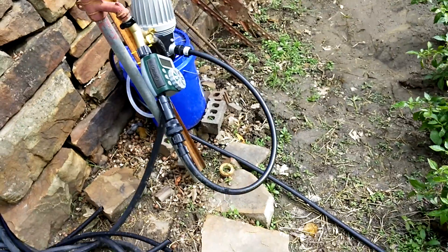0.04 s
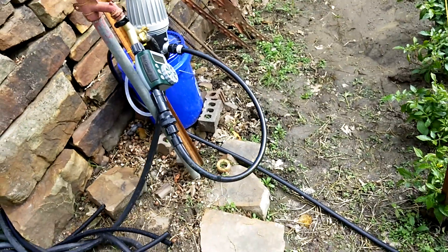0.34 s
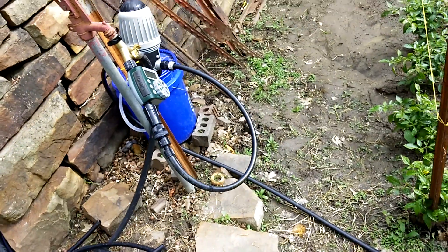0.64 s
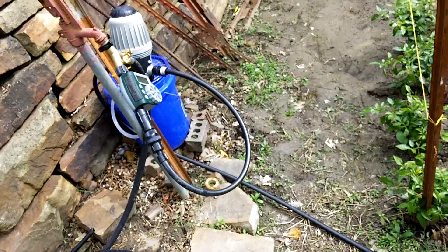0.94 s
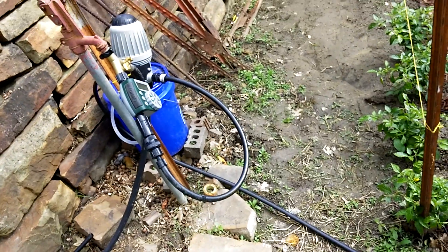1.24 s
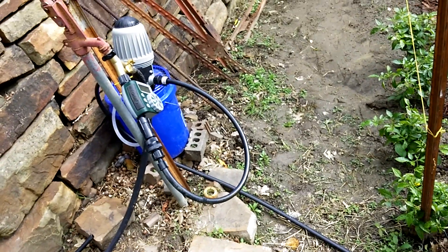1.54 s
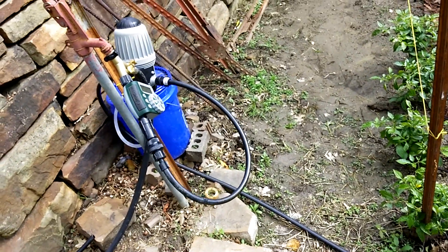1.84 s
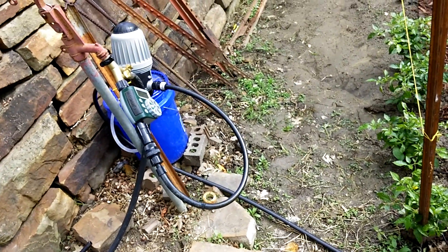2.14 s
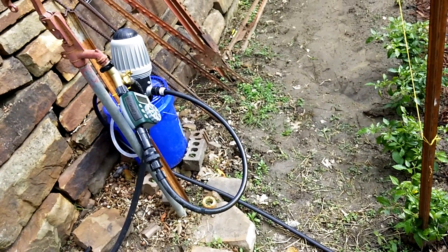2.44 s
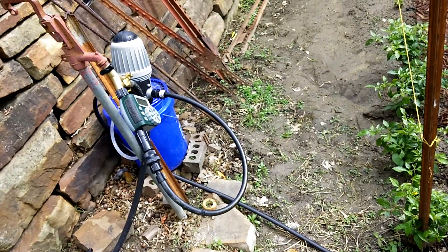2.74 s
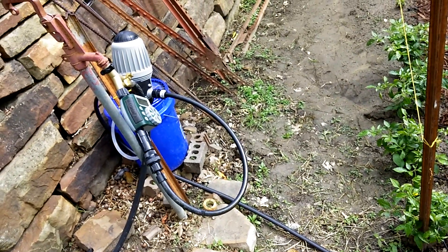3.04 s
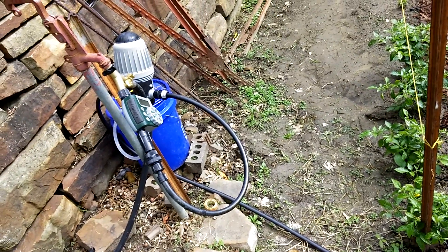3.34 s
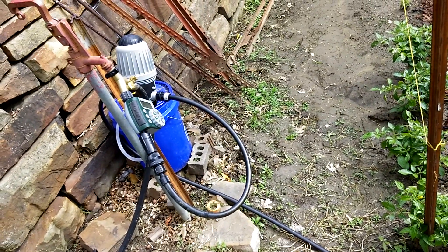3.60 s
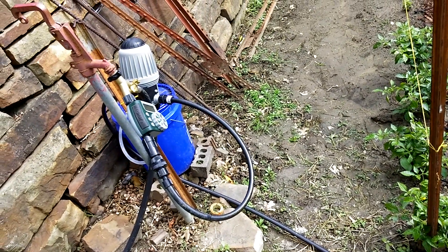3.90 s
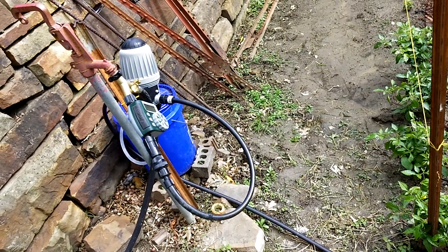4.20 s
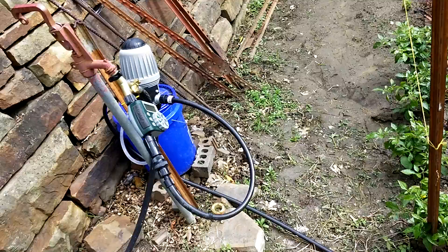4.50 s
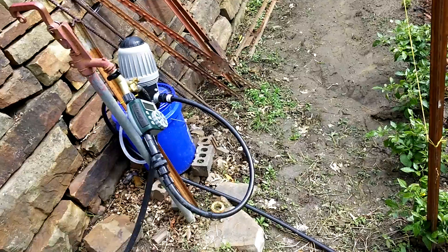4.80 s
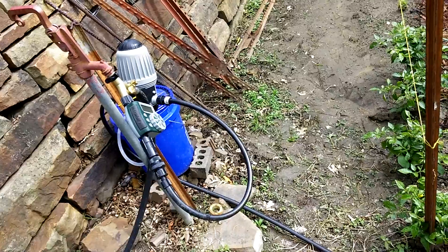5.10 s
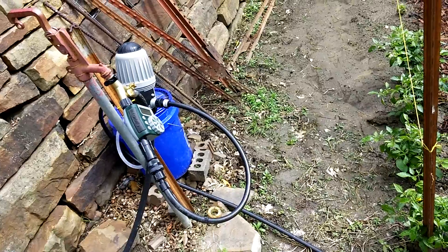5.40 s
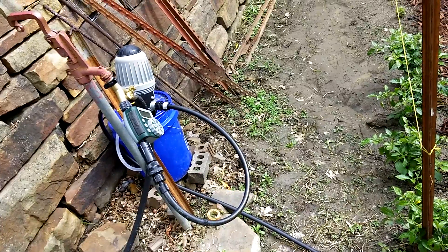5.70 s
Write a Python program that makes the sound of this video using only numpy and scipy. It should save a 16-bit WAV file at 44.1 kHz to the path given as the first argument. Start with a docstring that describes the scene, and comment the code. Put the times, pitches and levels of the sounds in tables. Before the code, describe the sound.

It begins quietly outdoors, with a low distant wash and a little wind rumbling on the microphone. Around 0.5 seconds a hand rubs a valve handle, which gives several small dry clicks. At about 1.3 seconds the handle squeaks faintly and clicks again. At 1.7 seconds the valve opens with a sharp knock and a gush, and water hisses into a garden hose, high and fizzy, close and toward the right. The hiss is strongest until about 2.2 seconds, then settles. The plastic housing of a fertilizer injector rushes, hums low and gurgles as it fills. From 2.5 seconds its piston makes tight, hollow double knocks, a little over twice a second. The splashing inside builds until nearly 4 seconds, then drops to a trickle. The hiss, rush, occasional glugs and steady knocks continue to the end, just short of 6 seconds.

```python
"""Outdoors, over a distant wash and a little wind, a hand rubs, clicks and squeaks a valve handle.
At about 1.7 seconds the valve of the garden drip line opens: water slams in and hisses through it.
The plastic housing of a fertilizer injector rushes, gurgles and hums as it fills, and its piston
settles into a double knock a little over twice a second. Near 4 seconds the air is out of the housing
and the splashing drops to a trickle, while the hiss, rush and knocks carry on."""
import sys
import numpy as np
from scipy import signal
from scipy.fft import rfft, irfft
from scipy.io import wavfile
from scipy.ndimage import uniform_filter1d

SR = 44100
rng = np.random.default_rng(int(sys.argv[2]) if len(sys.argv) > 2 else 0)


def put_to_file(sound):
    """Save the sound as 16-bit audio at rate SR, in the file named by the first command-line argument."""
    columns = np.atleast_2d(sound).T  # one column per channel
    safe = np.clip(columns, -1, 1)
    whole_steps = np.round(safe * 32767)
    wavfile.write(sys.argv[1], SR, whole_steps.astype(np.int16))


N = 253575
T = np.arange(N) / SR  # the time of every sample
HZ = np.fft.rfftfreq(N, 1 / SR)  # the frequency of every point in a spectrum
OPEN_S = 1.736  # the valve lets go
SINCE_OPEN_S = np.maximum(T - OPEN_S, 0)
OPENED = np.clip(SINCE_OPEN_S / 0.00047, 0, 1)  # 0 while the valve is shut, then 1


def amp(db):
    """Turns decibels into a number to multiply a sound by."""
    return 10 ** (np.asarray(db) / 20)


def unit(x):
    """Scales a signal to an average (rms) size of 1."""
    return x / np.sqrt(np.mean(x ** 2) + 1e-20)


def over_time(rows):
    """Joins (time, value) rows into a value for every sample."""
    return np.interp(T, *np.transpose(rows))


def over_frequency(rows):
    """Joins (frequency, value) rows into a value for every frequency."""
    hz, value = np.transpose(rows)
    return np.interp(np.log(HZ + 1), np.log(hz + 1), value)


def add(mix, start_s, sound):
    """Adds a sound to the mix at the given time."""
    part = mix[..., round(start_s * SR):][..., :sound.shape[-1]]
    part += sound[..., :part.shape[-1]]


def wander(hz):
    """A random drift of average size 1, wobbling up to about hz times a second."""
    return unit(irfft(rfft(rng.standard_normal(N)) / np.sqrt(1 + (HZ / hz) ** 4), N))


def noise_pair(likeness):
    """Left and right spectra of white noise: likeness 0 is unrelated, 1 is identical."""
    shared, separate = rfft(rng.standard_normal((2, N)))
    return np.array([likeness * shared + np.sqrt(1 - likeness ** 2) * separate, shared])


def sound_of(spectra):
    """Turns two spectra into stereo sound whose middle has an average size of 1."""
    stereo = irfft(spectra, N)
    return stereo / np.std(stereo.mean(0))


def pan(db):
    """Left and right gains: positive dB leans left, negative leans right."""
    return amp(np.array([[.5], [-.5]]) * db)


def resonances(modes):
    """How strongly a hollow body passes each frequency, given the notes it rings at."""
    return np.sqrt(sum(amp(db) ** 2 / (1 + 2 * ((HZ - hz) / width) ** 2) ** 2 for hz, width, db in modes))


# The tone of the distant wash. Each row: frequency in Hz, level in dB.
WASH_TONE = [(71, -11.5), (120, -5.5), (144, -14), (284, -2), (362, -6), (524, -5), (892, 2.5), (1340, -8),
             (1460, -15.5), (1860, -18), (2590, -27.5), (3590, -38.5), (5630, -42.5), (7050, -44.5),
             (16000, -51)]
# How alike it is in both ears. Each row: frequency in Hz, likeness from 0 to 1.
WASH_LIKENESS = [(100, 0.97), (400, 0.78), (1000, 0.25), (2500, 0.043), (6000, 0.08)]
# Its level in the mix, turned down once the water runs. Each row: time in seconds, level in dB.
WASH_MIX_LEVEL = [(0, -38), (.7, -34.5), (1.7, -35), (1.95, -41.5), (2.4, -38.5), (2.9, -44), (4.2, -49.5),
                  (5.75, -46.5)]


def distant_wash(waver_db=0.97):
    """A low outdoor wash that wavers slightly and is turned down in the mix once the water runs."""
    spectra = noise_pair(over_frequency(WASH_LIKENESS)) * amp(over_frequency(WASH_TONE))
    return sound_of(spectra) * amp(over_time(WASH_MIX_LEVEL) + waver_db * wander(5.5))


# The tone of the wind. Each row: frequency in Hz, level in dB.
WIND_TONE = [(15, -40), (30, -13), (43, 3.5), (100, 5.5), (140, -10), (250, -27), (700, -80)]
# The strength of the breeze. Each row: time in seconds, level in dB.
WIND_LEVEL = [(0, -58), (0.95, -48.5), (1.45, -49), (1.72, -41), (2.05, -52), (2.9, -48), (4.3, -46.5),
              (5.2, -49), (5.75, -42)]


def wind(gust_db=2.5, thump_s=5.643):
    """Gusts rumble on the microphone, with one soft thump on the left."""
    rumble = sound_of(noise_pair(1.0) * amp(over_frequency(WIND_TONE)) * pan(2.5))
    gusts = amp(over_time(WIND_LEVEL) + gust_db * wander(7))
    t = T - thump_s
    thump = amp(-27) * np.exp(-(t / .014) ** 2) * np.cos(2 * np.pi * 66 * t)
    return rumble * gusts + thump * pan(16)


# The tone of the hand rubbing the handle. Each row: frequency in Hz, level in dB.
RUB_TONE = [(1200, -1.5), (2500, 1.5), (4300, -8), (5300, -1.5), (6200, -10), (7500, -17.5), (12000, -14.5),
            (15000, -14)]
# Slides of the hand. Each row: middle in seconds, half the length in seconds, level in dB.
HAND_SLIDES = [(0.02, 0.092, -67), (0.468, 0.036, -49.5), (0.54, 0.23, -57), (1.45, 0.14, -72)]
# Clicks of the handle. Each row: start in seconds, relative level in dB, pitch in Hz.
HANDLE_CLICKS = [(.583, -26.5, 4020), (0.636, -36, 5700), (.652, -29, 4000), (.658, -30.5, 2800),
                 (0.664, -34, 3020), (0.715, -34, 3220), (.742, -39, 2800), (1.319, -52, 11000),
                 (1.327, -41, 5460), (1.331, -38, 3000), (1.479, -39, 4800), (1.718, -35, 3460)]


def handle(grip_db=-68, slide_edge_s=0.07, ring_s=0.0047, snap_s=0.00038):
    """The hand swishes over the handle, which clicks with a dry snap as it turns."""
    slides = sum(amp(db) * np.clip(.5 + (half_s - abs(T - middle_s)) / slide_edge_s, 0, 1)
                 for middle_s, half_s, db in HAND_SLIDES)
    out = sound_of(noise_pair(0.078) * amp(over_frequency(RUB_TONE))) * (amp(grip_db) + slides)
    t = T[:SR // 20]
    for start_s, db, hz in HANDLE_CLICKS:
        band = signal.butter(1, [hz * 0.94, hz * 0.99], "band", fs=SR)
        noise = rng.standard_normal((2, len(t)))
        ring = amp(db - 5) * np.exp(-t / ring_s) * unit(signal.lfilter(*band, noise))
        snap = amp(db - 13) * np.exp(-t / snap_s) * noise
        add(out, start_s, ring + snap)
    return out


def squeak(start_s=1.28, length_s=0.3, settled_hz=2550, sag_s=0.076, flutter_db=3.0):
    """The turning handle squeaks once, swelling and fading while its pitch sags and steadies."""
    strain = np.exp(-np.maximum(T - start_s, 0) / sag_s)
    roughness = (.04 + 0.146 * strain) * wander(340)
    pitch_hz = settled_hz * (1 + 0.15 * strain) * (1 + roughness)
    arch_db = -53.5 - 8.5 * (2 * (T - start_s) / length_s - 1) ** 2
    tone = np.sin(2 * np.pi * np.cumsum(pitch_hz) / SR)
    return tone * amp(arch_db + flutter_db * wander(90)) * pan(-10)


def gush(db, fade_s=0.067):
    """The strength of the first gush into the empty housing, dying away after the valve opens."""
    return amp(db) * np.exp(-SINCE_OPEN_S / fade_s)


# The low notes of the filling line. Each row: pitch in Hz, width in Hz, level in dB.
LINE_NOTES = [(190, 104, -9), (255.7, 41, 3), (331, 35, -4)]


def hollow_note(climb_db_per_s=5):
    """The line hums with the first gush, then swells steadily as it fills."""
    level = np.hypot(gush(-42), amp(-56.5 + climb_db_per_s * SINCE_OPEN_S))
    return sound_of(noise_pair(0.98) * resonances(LINE_NOTES)) * level * OPENED


# The notes of the loose water. Each row: pitch in Hz, width in Hz, level in dB.
SPLASH_NOTES = [(640, 80, -11.5), (920, 170, -0.5), (1029, 61, 3.5)]


def splash(build_db_per_s=9.5, air_out_s=3.85, fade_s=0.065, trickle_db=-50.5, churn_db=2.5):
    """Water gushes in, tumbles harder until the air is out of the housing, then dies to a trickle."""
    build_up = amp(-59 + build_db_per_s * SINCE_OPEN_S)
    tumble = build_up * np.exp(-np.maximum(T - air_out_s, 0) / fade_s)
    level = np.sqrt(gush(-35) ** 2 + tumble ** 2 + amp(trickle_db) ** 2)
    water = sound_of(noise_pair(0.8) * resonances(SPLASH_NOTES) * pan(-2))
    return water * level * amp(churn_db * wander(54)) * OPENED


# Air pockets in the water. Each row: start in seconds, relative level in dB, pitch in Hz.
AIR_POCKETS = [(1.791, -20.5, 1290), (1.818, -20, 1610), (2.816, -19, 1400), (3.2979, -25.5, 1450),
               (3.7369, -18, 1340), (3.7632, -25, 1110), (4.635, -17.5, 1380), (4.666, -22.5, 1210),
               (5.5182, -19.5, 1360)]


def glugs(swell_s=0.0019):
    """Each air pocket rings briefly as it is squeezed through."""
    out, t = np.zeros(N), T[:SR // 20]
    swell_and_fade = t / swell_s * np.exp(1 - t / swell_s)
    for start_s, db, hz in AIR_POCKETS:
        tone = np.sin(2 * np.pi * (hz * t + rng.random()))
        add(out, start_s, amp(db - 3) * swell_and_fade * tone)
    return out * pan(-5)


# The notes of the filled housing. Each row: pitch in Hz, width in Hz, level in dB.
HOUSING_NOTES = [(637, 43, -11.5), (720, 92, -10), (995, 39, -0.5), (1103, 76, 1), (1246, 51, -5.5),
                 (1428, 178, -2.5), (1698, 85, -1), (1897, 70, -3.5), (2236, 170, 2.5), (2480, 230, -3),
                 (2630, 600, -8), (3380, 360, -5)]


def rush(grain_db=2, churn_db=2.4, fill_db_per_s=0.91, drive_db=1.5, ease_s=0.2):
    """Swirling water stirs each note of the housing in its own uneven bursts, louder as it fills."""
    shared_grain_db = grain_db * wander(660)
    spectra = 0
    for note in HOUSING_NOTES:
        noise = irfft(noise_pair(0.58), N)
        bursts = amp(shared_grain_db + churn_db * wander(6.1))
        spectra += rfft(noise * bursts) * resonances([note])
    # The rush swells on every second stroke, when the piston is driven.
    driven = np.searchsorted([row[0] for row in PISTON_STROKES], T) % 2
    swell = uniform_filter1d(driven.astype(float), round(ease_s * SR))
    level = amp(-37.5 + fill_db_per_s * SINCE_OPEN_S + drive_db * swell)
    return sound_of(spectra * pan(-4)) * level * OPENED


# Echoes off a pile of stones. Each row: left delay in seconds, right delay in seconds, level in dB.
STONE_ECHOES = [(.0021, .0026, -21), (.0049, .0043, -21), (.0083, .0091, -22), (.0152, .0137, -24)]


def stone_echoes(spectra):
    """Quick echoes, a little different on each side, boost some frequencies and weaken others."""
    echoes = sum(amp(db) * np.exp(-2j * np.pi * HZ * np.array([[left_s], [right_s]]))
                 for left_s, right_s, db in STONE_ECHOES)
    return spectra * (1 + echoes)


def fizz(likeness, sputter_db, flutter_db, left_lag_s):
    """Spectra of noise that sputters as tiny bubbles collapse, reaching the right side first."""
    force = amp(sputter_db * np.clip(wander(570), -2, 2) + flutter_db * wander(32))
    spectra = rfft(irfft(noise_pair(likeness), N) * force)
    spectra[0] *= np.exp(-2j * np.pi * HZ * left_lag_s)
    return spectra


# The tone of the fizz in the hose. Each row: frequency in Hz, level in dB.
SPRAY_TONE = [(2000, -18.5), (3100, 3.5), (3600, -45), (4100, 2.5), (4700, 4.5), (5400, 4.5), (6000, 2),
              (7500, 4), (10500, -4), (12000, -3), (13700, -13.5), (14600, -3), (15600, -8)]


def spray(settled_jet_db=-24.5, surge_share=0.49):
    """The jet breaks up inside the hose with a wider fizz that partly follows its surges."""
    noise = fizz(likeness=.5, sputter_db=1.0, flutter_db=1.32, left_lag_s=0.000314)
    spectra = noise * amp(over_frequency(SPRAY_TONE)) * pan(-2)
    surge_db = over_time(JET_LEVEL) - settled_jet_db
    return sound_of(stone_echoes(spectra)) * amp(-36.5 + surge_share * surge_db) * OPENED


# The jet surges while air leaves the line, then settles. Each row: time in seconds, relative level in dB.
JET_LEVEL = [(1.745, -26.5), (1.77, -31.5), (1.805, -18.5), (1.86, -17), (1.885, -21), (1.91, -19.5),
             (2.13, -19.5), (2.22, -25.5), (2.42, -28), (2.53, -26.5), (2.6, -24.5), (2.9, -20.5),
             (3.02, -24.5), (3.43, -25.5), (3.5, -23.5), (3.95, -26.5), (5.75, -26.5)]
# The tone of its hiss. Each row: frequency in Hz, level in dB.
JET_TONE = [(3000, -75), (5500, -25), (6900, -24), (7500, -9.5), (8100, -4.5), (8900, -3), (9400, -3),
            (10000, -3.5), (10700, -6.5), (11400, -18.5), (12300, -22), (13500, -30), (16000, -40)]
# The narrow notes of the hollow inside the valve. Each row: pitch in Hz, width in Hz, level in dB.
VALVE_NOTES = [(8900, 90, -11), (9280, 87, 4), (9220, 100, -20.5), (9720, 200, -8), (10550, 83, -16),
               (11460, 170, -1.5)]


def jet():
    """Tiny bubbles collapse in the valve's jet (cavitation): a high hiss, tinted by the valve's hollow."""
    noise = fizz(likeness=.9, sputter_db=1.5, flutter_db=.5, left_lag_s=0.00029)
    tone = amp(over_frequency(JET_TONE)) * (1 + resonances(VALVE_NOTES))
    hiss = sound_of(stone_echoes(noise * tone * pan(-23)))
    return hiss * amp(over_time(JET_LEVEL) - 0.42) * OPENED


# The piston flips, then lands in its seat. Each row: start in seconds, flip level in dB,
# brightness in dB, wait until the landing in seconds, landing level in dB.
PISTON_STROKES = [(1.736, -21.5, 4, .011, -17.5), (1.879, -20.5, -0.5, .004, -31),
                  (2.529, -26, 2, 0.0074, -26.5), (2.93, -22.5, -0.5, 0.0099, -24.5),
                  (3.443, -20.5, 0.8, 0.01, -26.5), (3.854, -23, 1.5, 0.012, -24),
                  (4.3353, -21.5, 6.5, .0105, -21.5), (4.755, -19, 0.5, .012, -26.5),
                  (5.2187, -19, 3, 0.01, -24), (5.6364, -19.5, 3, 0.011, -26)]


def piston_blows(cushion_db=4):
    """Gives (start, treble dB, bass dB) for each flip and its landing, which water cushions and dulls."""
    for start_s, flip_db, bright_db, wait_s, land_db in PISTON_STROKES:
        yield start_s, flip_db + bright_db, flip_db - bright_db
        land_bright_db = bright_db - cushion_db
        yield start_s + wait_s, land_db + land_bright_db, land_db - land_bright_db


# The notes of the struck shell. Each row: pitch in Hz, relative level in dB, seconds to fade by 60 dB.
SHELL_NOTES = [(297, -9.5, 0.018), (557, -15.5, 0.029), (758, -6, 0.017), (985, -13, 0.067),
               (1214, -3.5, 0.034), (1414, -3, 0.04), (1820, -5, 0.024), (2317, -5.5, 0.042),
               (2426, 4.5, 0.0099), (2883, -13, 0.045), (3450, -51, .02)]


def piston_knocks(rise_s=0.00071, crack_s=0.0062, rumble_s=0.031, stereo_spread=0.47):
    """Each blow of the piston rings the plastic shell with a dry crack, and the water inside rumbles on."""
    out, t = np.zeros((2, N)), T[:SR // 6]
    hz, db, fade_s = np.transpose(SHELL_NOTES)[:, :, None]
    crack_band = signal.butter(2, [1200, 3600], "band", fs=SR, output="sos")
    rumble_band = signal.butter(2, [700, 1600], "band", fs=SR, output="sos")
    attack = 1 - np.exp(-t / rise_s)
    for start_s, treble_db, bass_db in piston_blows():
        detune, phase, left_shift = rng.standard_normal((3, len(SHELL_NOTES), 1))
        phases = 2 * np.pi * phase + np.array([stereo_spread * left_shift, np.zeros_like(left_shift)])
        tones = np.sin(2 * np.pi * hz * (1 + 0.02 * detune) * t + phases)
        struck_db = db + 5 + np.interp(hz, [1400, 2200], [bass_db, treble_db])
        ring = (amp(struck_db - 60 * t / fade_s) * tones).sum(1)
        noise = rng.standard_normal((2, len(t)))
        crack = amp(treble_db - 3) * np.exp(-t / crack_s) * unit(signal.sosfilt(crack_band, noise))
        rumble = amp(bass_db - 11) * np.exp(-t / rumble_s) * unit(signal.sosfilt(rumble_band, noise))
        add(out, start_s, (ring + rumble + crack) * attack)
    return out * pan(-5)


def scene():
    """Adds up the outdoor background, the hand, the water and the piston."""
    water = jet() + spray() + rush() + splash() + hollow_note() + glugs()
    return distant_wash() + wind() + handle() + squeak() + water + piston_knocks()


def record(dry, lowest_hz=38, highest_hz=16050):
    """The microphone cuts the deepest rumble, then the recorder cuts the highest treble."""
    low_cut = signal.butter(4, lowest_hz, "high", fs=SR, output="sos")
    high_cut = signal.firwin(511, highest_hz, window=("kaiser", 9), fs=SR)
    return signal.oaconvolve(signal.sosfilt(low_cut, dry), high_cut[None], "same")


dry = scene()
out = record(dry)
put_to_file(out)
```